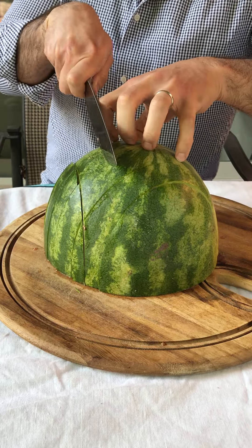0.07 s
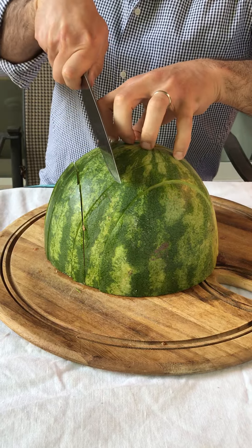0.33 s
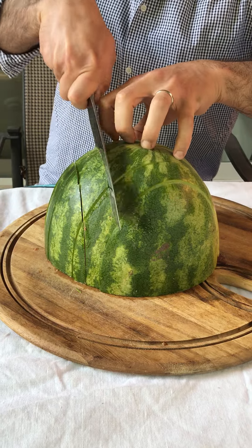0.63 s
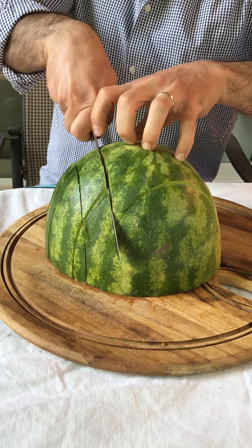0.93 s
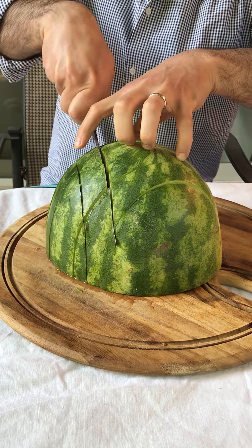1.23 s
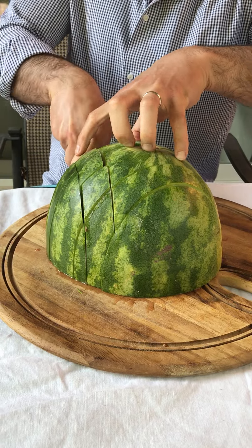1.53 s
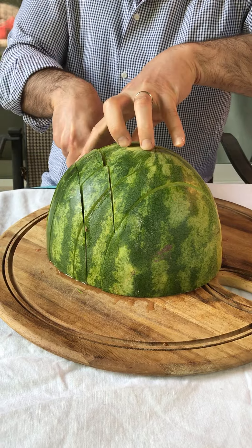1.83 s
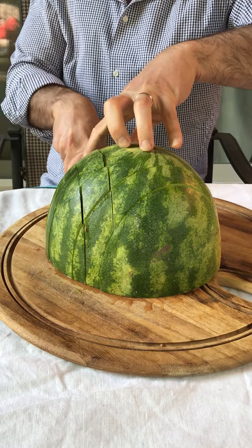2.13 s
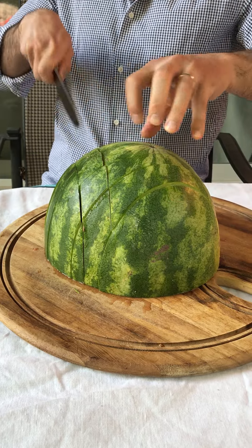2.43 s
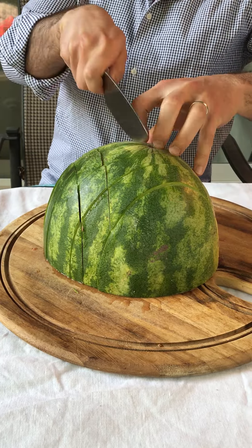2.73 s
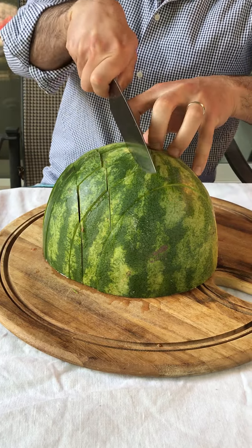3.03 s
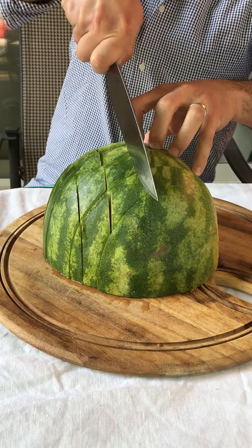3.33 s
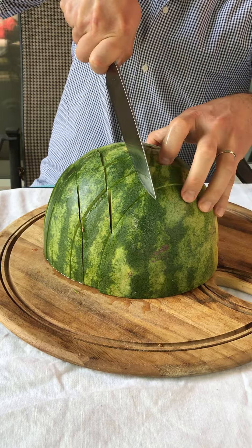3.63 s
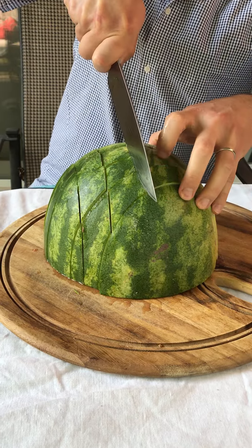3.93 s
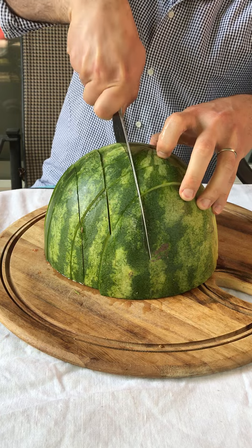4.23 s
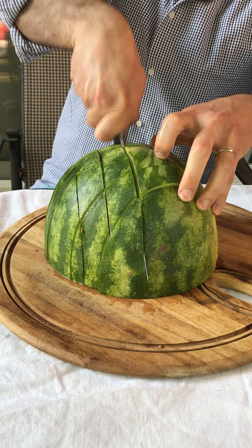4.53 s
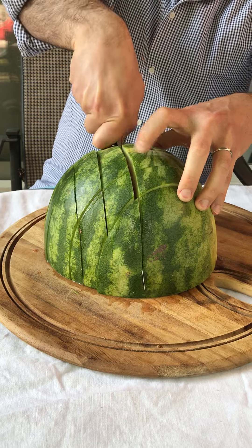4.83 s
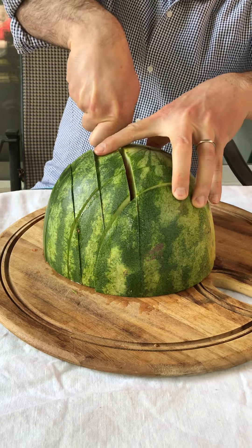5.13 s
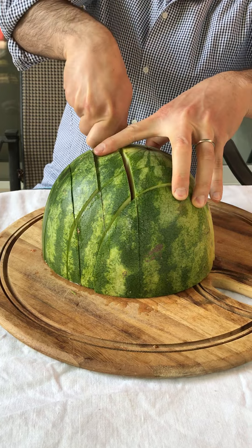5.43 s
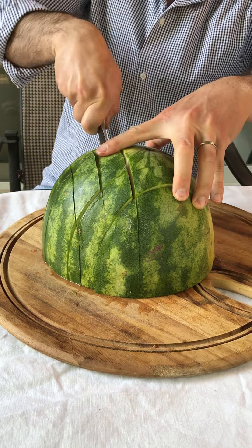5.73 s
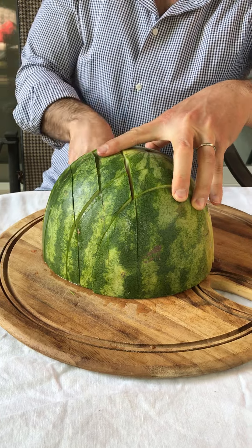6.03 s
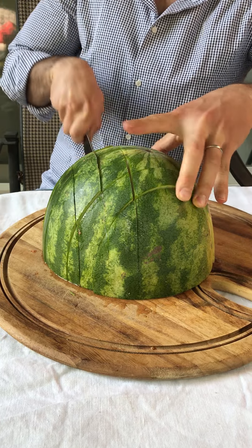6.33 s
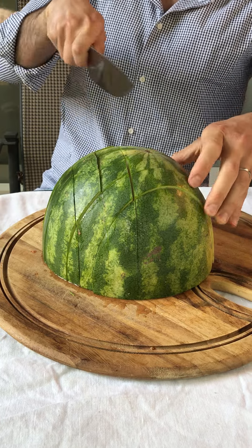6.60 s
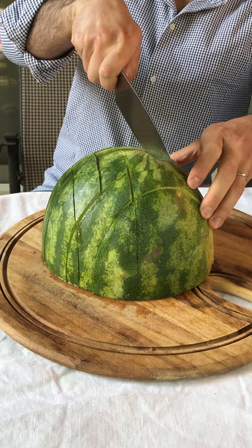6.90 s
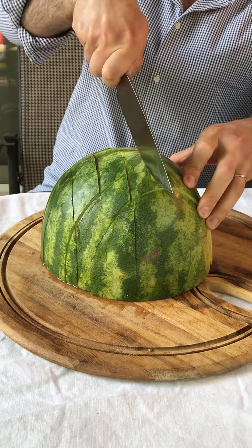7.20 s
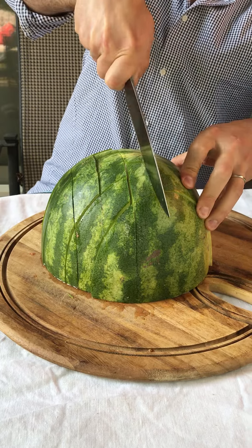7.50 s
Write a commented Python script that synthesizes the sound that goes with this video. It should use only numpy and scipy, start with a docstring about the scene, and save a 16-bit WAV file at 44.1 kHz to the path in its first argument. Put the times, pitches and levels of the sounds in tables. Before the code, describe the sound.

A kitchen knife taps a watermelon's skin, slides through the wet flesh in short, soft hisses and knocks sharply on a wooden board. After faint scrapes and taps, a second cut starts. The rind tears in a run of short crunches with hollow thuds, then the blade knocks on the board again. The sound is close, in a small quiet room with a faint low rumble.

```python
"""Cutting a watermelon

A kitchen knife saws down through half a watermelon on a wooden board, twice, in a small quiet room.
The blade hisses through wet flesh, the rind tears in short crunches that thud in the fruit,
and each cut ends with the edge knocking on the board. Hands and sleeves stir faintly."""
import sys
import numpy as np
from scipy import signal
from scipy.fft import rfft, irfft, next_fast_len
from scipy.io import wavfile
from scipy.ndimage import uniform_filter1d

SR = 44100
rng = np.random.default_rng(int(sys.argv[2]) if len(sys.argv) > 2 else 0)


def master_out(mix):
    """Clip the mix to full scale and print it as 16-bit PCM to the path in sys.argv[1]."""
    frames = np.transpose(np.atleast_2d(mix))
    ceiling = np.clip(frames, -1, 1)
    pcm = np.round(ceiling * 32767).astype(np.int16)
    wavfile.write(sys.argv[1], SR, pcm)


N = 342216
SIZE = SR // 2  # samples in one short sound
T = np.arange(SIZE) / SR
HZ = np.fft.rfftfreq(SIZE, 1 / SR)

# the arm shifts the knife or draws it out: middle_s, length_s, level_db
KNIFE_SHIFTS = [(1.0, 0.17, -58), (2.2, 0.45, -55.5), (3.9, 0.71, -65.5), (4.53, 0.086, -51),
                (6.3, 0.35, -59.5)]
# the edge hits the board: start_s, level_db, delay_at_1khz_s, crack_db, crack_length_s, ring_db, room_db
BOARD_KNOCKS = [(1.4980, 11.5, 0.001055, -16.5, 0.003, -26.5, -8.5),
                (6.0152, 12, 0.00115, -25.5, 0.012, -33.5, -10)]
# the rind tears: start_s, length_s, level_db, brightness_db_per_octave
RIND_TEARS = [(1.564, 0.014, -38.5, -2.5), (4.695, 0.037, -43, -3.5), (4.725, 0.03, -34, -2),
              (4.76, 0.021, -35, -7), (5.231, 0.035, -36.5, 0), (5.437, 0.0041, -42.5, -2),
              (5.499, 0.032, -37.5, -5.5), (5.553, 0.022, -42, -9.5)]
# the wedged blade slips and jolts the fruit: start_s, level_db, pitch_hz
BLADE_SLIPS = [(4.629, -33, 298), (4.693, -27.5, 163), (4.895, -29, 309), (5.185, -23.5, 423),
               (5.391, -28.5, 322), (5.442, -23, 390), (5.54, -27, 318)]


def amp(db):
    """Turn decibels into a gain."""
    return 10 ** (np.asarray(db) / 20)


def unit(x):
    """Scale a sound to an average (rms) level of 1."""
    return x / np.sqrt(np.mean(x ** 2) + 1e-20)


def along(points, hz):
    """Read a curve of (pitch_hz, value) points on a log pitch scale."""
    pitches, values = np.transpose(points)
    return np.interp(np.log(hz + 1), np.log(pitches + 1), values)


def filtered(x, response):
    """Scale each frequency in a sound by response(hz)."""
    size = next_fast_len(len(x) + SIZE)
    return irfft(rfft(x, size) * response(np.fft.rfftfreq(size, 1 / SR)), size)[:len(x)]


def coloured(x, tone, slope=0):
    """Give a sound a tone curve, tilted by slope dB per octave, at an average level of 1."""
    def response(hz):
        octaves = np.log2(np.maximum(hz, 100) / 1000)
        return amp(along(tone, hz) + slope * octaves)
    return unit(filtered(x, response))


def resonance(hz, centre, width):
    """The response of something that rings at one pitch and dies away."""
    return 1j * hz * width / (centre ** 2 - hz ** 2 + 1j * hz * width)


def add(track, start_s, sound):
    """Mix a sound into the track."""
    part = track[round(start_s * SR):][:len(sound)]
    part += sound[:len(part)]


def pops(size, per_s, spread_db):
    """Tiny random pops of uneven strength."""
    happens = rng.random(size) < per_s / SR
    return happens * rng.choice([-1, 1], size) * amp(spread_db * rng.standard_normal(size))


def swells(moves):
    """A gain that rises and falls smoothly for each (middle_s, length_s, level_db)."""
    t = np.arange(N) / SR
    return sum(amp(db) * np.exp(-np.abs(2 * (t - middle) / length) ** 3) for middle, length, db in moves)


def aftermath(hits, rise_s, fall_s):
    """A gain that rises and dies away after each (start_s, level_db)."""
    out = np.zeros(N)
    for start, db in hits:
        add(out, start, amp(db) * (1 - np.exp(-T / rise_s)) * np.exp(-T / fall_s))
    return out


def room(x, gap_s=0.005, build_s=0.00099):
    """The kitchen's echo: a short gap, then a smooth tail whose treble dies first."""
    # time to fade by 60 dB: pitch_hz, fade_s
    fade_times = [(150, 0.49), (400, 0.19), (1000, 0.17), (4000, 0.15), (8000, 0.092), (15000, 0.086)]
    # the echo's tone: pitch_hz, level_db
    echo_tone = [(60, -13), (190, 7.5), (380, -0.5), (1000, 2), (2000, 3), (3500, 4), (5500, 1.5),
                 (9000, 7.5), (15000, 1)]
    hz, t, bands = signal.stft(rng.standard_normal(SIZE), SR, nperseg=256)
    bands *= amp(-60 * t / along(fade_times, hz)[:, None])
    tail = signal.istft(bands, SR, nperseg=256)[1][:SIZE]
    spectrum = rfft(tail * (1 - np.exp(-T / build_s)))
    # many paths share the energy evenly between neighbouring bands
    spectrum /= np.sqrt(np.abs(uniform_filter1d(np.abs(spectrum) ** 2, size=120)))
    tail = irfft(spectrum * amp(along(echo_tone, HZ)), SIZE)[:SIZE * 3 // 4]
    return signal.fftconvolve(x, np.pad(tail, (round(gap_s * SR), 0)))[:len(x)]


def room_hiss():
    """The quiet room gives a faint, steady hiss."""
    # the hiss's tone: pitch_hz, level_db
    air_tone = [(150, -75), (250, -4), (277, 5), (324, 4.5), (360, -0.5), (467, -18.5), (627, 3.5),
                (746, -13), (1320, -3.5), (2000, -8), (2940, -3), (4860, -12), (5980, -9), (11800, -15),
                (15800, -17.5)]
    return amp(-56.5) * coloured(rng.standard_normal(N), air_tone)


def rumble():
    """The room and resting hands rumble; it grows as hands lean or a tear shakes the table."""
    # the rumble's tone: pitch_hz, level_db
    low_tone = [(20, -44), (30, -8), (45, -3.5), (68, 0), (115, -4), (150, -11.5), (200, -8.5), (280, -15),
                (450, -27), (900, -74)]
    # the hands lean on the melon: middle_s, length_s, level_db
    leans = [(.73, 0.67, -44.5), (2.94, 0.26, -50.5), (4.95, 0.14, -51), (5.68, 0.98, -45)]
    shudder = aftermath([(start, db - 2.5) for start, _, db, _ in RIND_TEARS], rise_s=0.01, fall_s=0.05)
    moving = np.hypot(swells(leans), shudder) * coloured(rng.standard_normal(N), low_tone)
    resting = amp(-49) * coloured(rng.standard_normal(N), low_tone, slope=1)
    return moving + resting


def rustle(steady_db=-56, flicker_db=3):
    """A faint hiss swells as the arm shifts; a brief noisy tail dies away after each knock."""
    hz, _, bands = signal.stft(pops(N, per_s=5000, spread_db=4), SR, nperseg=512)
    # the hiss flickers in short patches in the middle range, less in the treble
    depth = along([(4000, 1), (9000, 0.4)], hz)[:, None]
    patches = uniform_filter1d(rng.standard_normal(bands.shape), size=6, axis=0)
    patches = unit(uniform_filter1d(patches, size=8, axis=1))
    hiss = signal.istft(bands * amp(flicker_db * depth * patches), nperseg=512)[1][:N]
    hiss = coloured(hiss, [(300, -0.5), (1400, 3.5), (3000, 1), (6000, -5), (15000, -58)])
    level = np.hypot(amp(steady_db), swells(KNIFE_SHIFTS))
    tails = aftermath([(start, db - 42) for start, db, *_ in BOARD_KNOCKS], rise_s=0.004, fall_s=0.028)
    return (level + tails) * hiss


def juice(rest_db=-72):
    """Juice makes tiny wet clicks: faint while the blade rests, louder as it shifts."""
    clicks = np.tanh(pops(N, per_s=110, spread_db=6) / 5)
    clicks = coloured(clicks, [(600, -5), (2500, -3.5), (6000, 5.5), (15000, -1.0)])
    clicks *= np.hypot(amp(rest_db), amp(-8) * swells(KNIFE_SHIFTS))
    return clicks + room(clicks)


def taps(touch_count=8, touch_db=-41, touch_hz=3480, scatter_octaves=0.38, touch_fade_s=0.046):
    """Steel and fingertips tap the skin: a sharp start and a brief band of noise."""
    # taps on the skin: start_s, peak_db, pitch_hz, fade_s (time to fall by 60 dB)
    timed_taps = [(.537, -25.5, 3140, 0.03), (.991, -49, 4500, .012), (1.4535, -32.5, 6600, 0.019),
                  (1.996, -40, 2860, 0.079), (2.245, -42, 2520, 0.023), (2.607, -40.5, 1510, 0.042),
                  (3.498, -43, 2650, 0.064), (4.204, -31, 2400, 0.032), (5.004, -40.5, 1310, 0.021),
                  (7.094, -42, 3200, 0.03), (7.46, -39, 3700, 0.026)]
    touches = []  # fingertips also land at random
    for i, (when, pitch) in enumerate(rng.random((touch_count, 2))):
        start = (i + when) * N / SR / touch_count
        hz = touch_hz * 2 ** (scatter_octaves * (2 * pitch - 1))
        touches.append((start, touch_db, hz, touch_fade_s))
    out = np.zeros(N)
    for start, db, hz, fade_s in timed_taps + touches:
        fade = amp(-60 * T / fade_s) + 0.34 * amp(-60 * T / 0.0045)
        noise = rng.choice([-1, 1], SIZE) * fade
        tap = filtered(noise, lambda f: resonance(f, hz, width=0.66 * hz) ** 2)
        tap = amp(db) * tap / np.abs(tap).max()
        add(out, start, tap + amp(-2.5) * room(tap))
    return out


def slicing():
    """Each push of the blade bursts juicy cells in a short fizz."""
    # the blade slides through flesh: middle_s, length_s, level_db
    strokes = [(0.616, 0.076, -43.5), (0.811, 0.081, -43.5), (0.905, 0.019, -42.5), (1.486, 0.076, -40),
               (3.81, .025, -56), (4.21, 0.042, -41.5), (4.24, 0.07, -43), (4.455, 0.051, -47.5),
               (4.652, 0.079, -42.5), (5.176, 0.072, -45.5), (5.45, 0.088, -53), (6.026, 0.07, -39.5)]
    # the wet flesh's tone: pitch_hz, level_db
    flesh_tone = [(200, 12.5), (700, 3), (2000, 8), (4000, 7), (7000, 3.5), (10000, 1), (15500, -0.5)]
    fizz = swells(strokes) * coloured(pops(N, per_s=6200, spread_db=-2), flesh_tone)
    return fizz + amp(-19) * room(fizz)


def knocks(ring_rise_s=0.0012, contact_hz=4200):
    """The edge snaps the last rind and hits the board: a crack, a hollow knock and a short ring."""
    # the ways the board flexes, struck at two places: pitch_hz, width_hz, first_knock_db, second_knock_db
    board_notes = [(360, 150, 1, -1.5), (460, 160, -3, 5.5), (650, 140, -5, -1.5), (920, 200, -11, -0.5),
                   (1100, 130, 3, -18), (2100, 260, -6.5, -4), (3250, 500, -9, -19), (4900, 900, -17, -25)]
    # board and blade ring on: pitch_hz, fade_s (time to fall by 60 dB), first_knock_db, second_knock_db
    ring_notes = [(190, 0.42, -6, 3), (270, 0.18, 3.5, -15), (334, 0.087, -10, -21), (447, 0.097, 2.5, 12),
                  (602, 0.25, -16, -3), (790, 0.1, 1, -2), (912, 0.067, 6.5, 7), (987, 0.085, 10, -14),
                  (1103, 0.21, -18, -2), (1159, 0.11, 2, -10), (1370, 0.1, -14, -9), (1840, 0.1, 2, 7),
                  (2245, 0.11, 1.5, -3), (2410, 0.16, -5.5, -11)]
    # the snapping rind's tone: pitch_hz, level_db
    crack_tone = [(300, -29), (1000, -10), (1600, -2), (3300, 7.5), (5500, 2.5), (8500, -6.5),
                  (11000, -13.5), (15500, -17)]
    # nearby surfaces throw the treble back: delay_s, level_db
    walls = [(.0068, -9), (.0087, -10)]
    out = np.zeros(N)
    for i, (start, db, lag_s, crack_db, crack_s, ring_db, room_db) in enumerate(BOARD_KNOCKS):
        body = sum(amp(levels[i]) * resonance(HZ, hz, width) for hz, width, *levels in board_notes)
        body *= resonance(HZ, 215, 170) * 1j * HZ  # a small board gives off little bass
        body /= (1 + 1j * HZ / contact_hz) ** 2  # wet wood softens the hit
        # high notes travel faster through the board, so the treble arrives first
        knock = irfft(body * np.exp(-4j * np.pi * lag_s * np.sqrt(1000 * HZ)), SIZE)
        crack_shape = (1 - np.exp(-T / 0.00084)) * np.exp(-(T / crack_s) ** 2)
        crack = crack_shape * coloured(rng.standard_normal(SIZE), crack_tone)
        blow = amp(db) * knock / np.linalg.norm(knock) + amp(crack_db) * crack
        ring = sum(amp(levels[i] - 60 * T / fade_s) * np.sin(2 * np.pi * (hz * T + rng.random()))
                   for hz, fade_s, *levels in ring_notes)
        ring *= 1 - np.exp(-T / ring_rise_s)
        add(out, start, blow + amp(room_db) * room(blow) + amp(ring_db) * ring)
        treble = filtered(blow, lambda hz: 1j * hz / (1j * hz + 1200))
        for delay, wall_db in walls:
            add(out, start + delay * (1 + rng.normal(0, 0.014)), amp(wall_db) * treble)
    return out


def tearing(rise_share=0.047, slip_length_s=0.0086):
    """The tough rind gives way in clusters of snapping fibres; a slip snaps a few dull ones."""
    # the tearing rind's tone: pitch_hz, level_db
    rind_tone = [(150, -6), (500, 5.5), (1200, 6), (2500, 9), (4000, 5), (6000, 5), (8000, -5.5),
                 (15000, -20)]
    slip_crunches = [(start, slip_length_s, db - 16, -4) for start, db, _ in BLADE_SLIPS]
    out = np.zeros(N)
    for start, length, db, brightness in RIND_TEARS + slip_crunches:
        strain = (1 - np.exp(-T / (rise_share * length))) * np.exp(-(T / length) ** 3)
        fibres = coloured(pops(SIZE, per_s=4000, spread_db=5), rind_tone, brightness)
        crunch = amp(db) * strain * fibres
        add(out, start, crunch + amp(-10) * room(crunch))
    return out


def thuds(sag=0.044, rise_s=0.0013, swings_to_fade=9.3):
    """Tears and slips make the fruit ring briefly; the pitch sags as the strain lets go."""
    # a tear jolts the fruit as it opens and as it lets go: share_of_tear_length, boost_db, pitch_hz
    recoils = [(0.252, 12.5, 315), (.65, 3.5, 235.4)]
    tear_jolts = [(start + share * length, db + boost_db, hz)
                  for start, length, db, _ in RIND_TEARS for share, boost_db, hz in recoils]
    out = np.zeros(N)
    for start, db, hz in BLADE_SLIPS + tear_jolts:
        pitch = hz * (1 + sag * (2 * np.exp(-T / 0.0028) - 1))
        loudness = amp(db + 2 - 60 * T * hz / swings_to_fade) * (1 - np.exp(-T / rise_s))
        thud = loudness * np.sin(2 * np.pi * np.cumsum(pitch) / SR)
        add(out, start, thud + amp(-5) * room(thud))
    return out


def rubbing(pitch_hz=2660, width_hz=1800):
    """The edge drags over waxy skin, and its tiny catches make the blade ring."""
    # the edge seeks the next cut: middle_s, length_s, level_db
    rubs = [(2.88, 0.2, -58.5), (3.24, .05, -52.5), (3.52, 0.072, -56), (6.59, 0.069, -58)]
    catches = pops(N, per_s=2500, spread_db=5)
    scrape = filtered(catches, lambda hz: resonance(hz, pitch_hz, width_hz) ** 2)
    return swells(rubs) * unit(scrape)


def scene():
    """All the sounds meet at one close microphone."""
    cutting = knocks() + slicing() + tearing() + thuds() + taps() + rubbing() + juice()
    return (cutting + rumble() + room_hiss() + rustle())[None]


def record(dry, top_hz=15850):
    """Cut away the very highest treble."""
    return filtered(dry[0], lambda hz: hz < top_hz)[None]


dry = scene()
out = record(dry)
master_out(out)
```